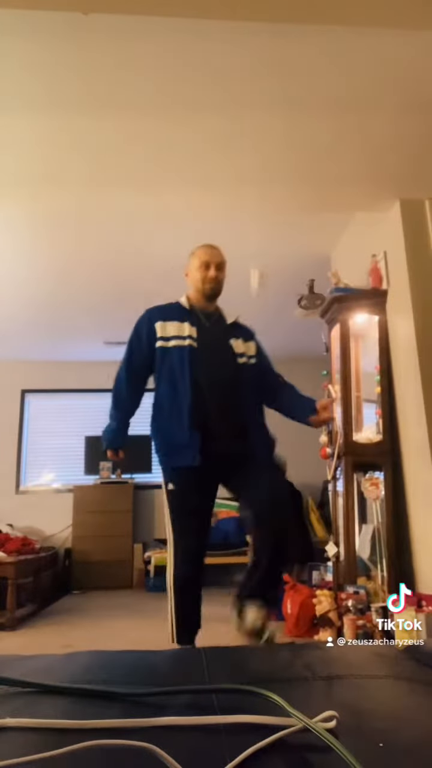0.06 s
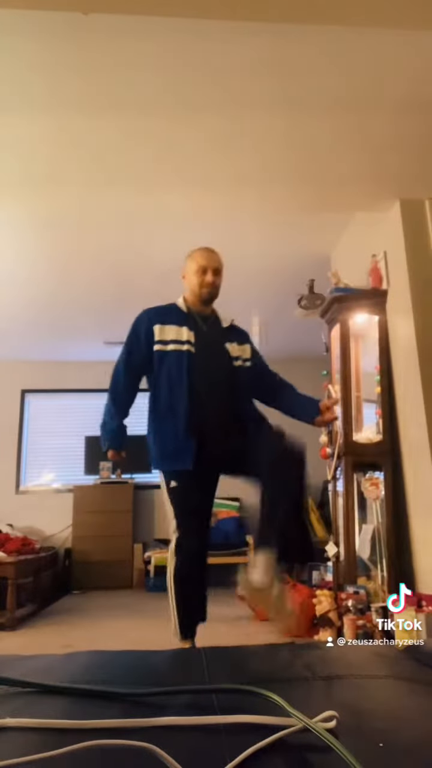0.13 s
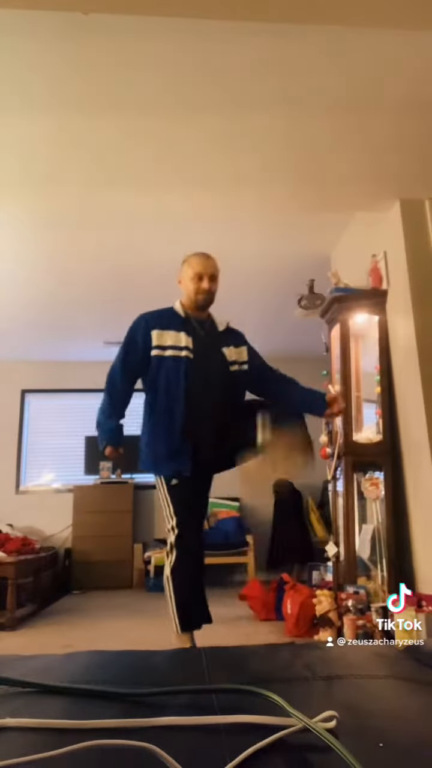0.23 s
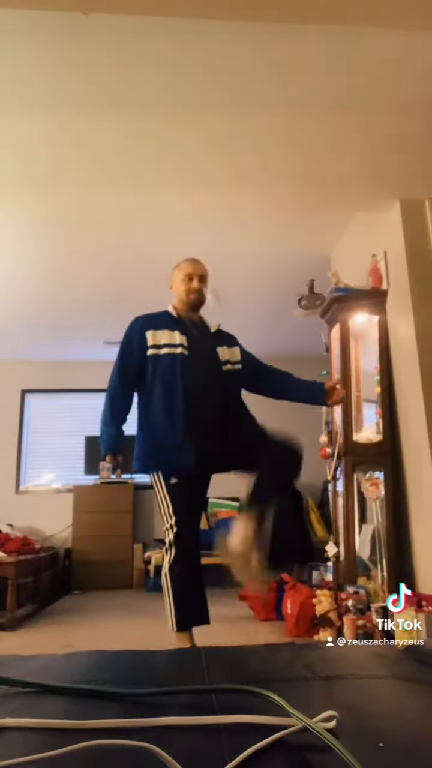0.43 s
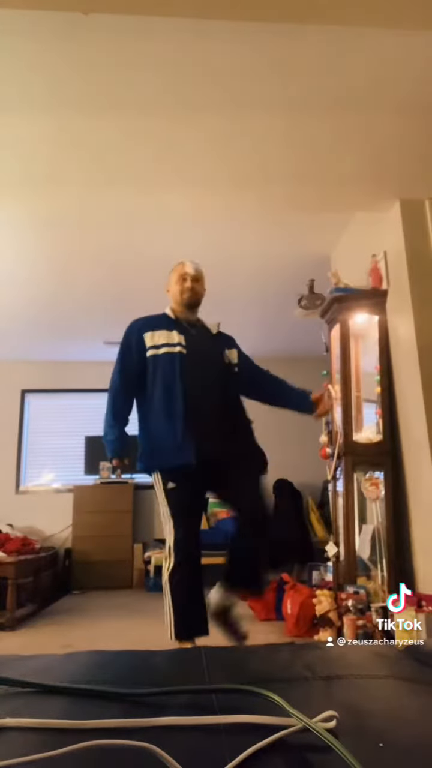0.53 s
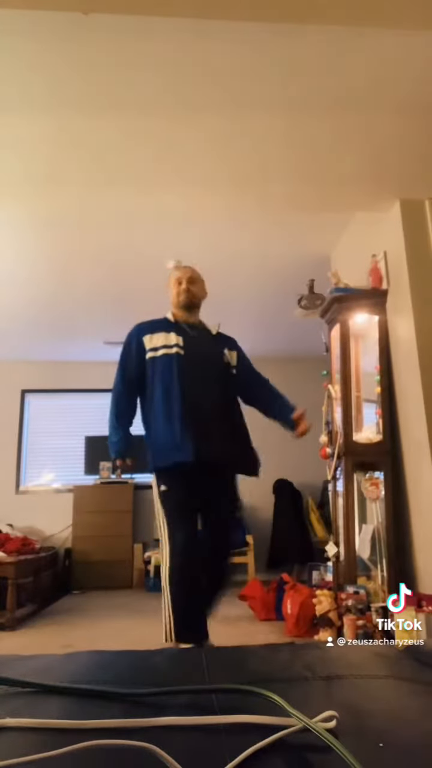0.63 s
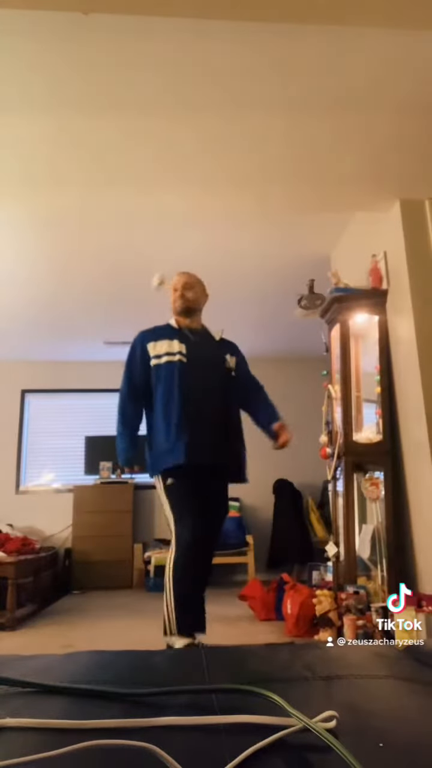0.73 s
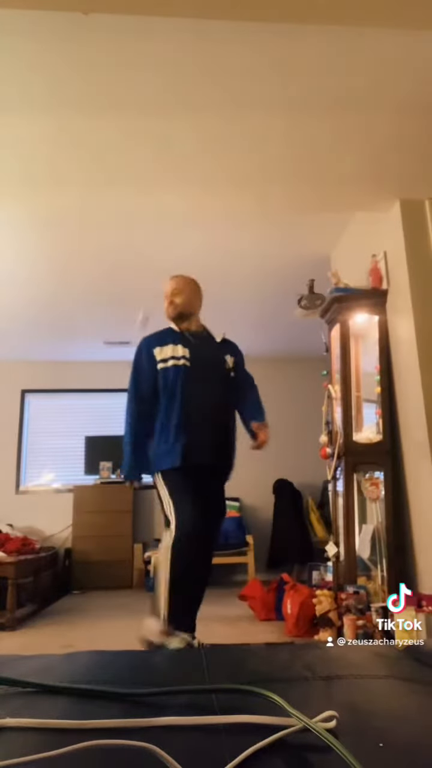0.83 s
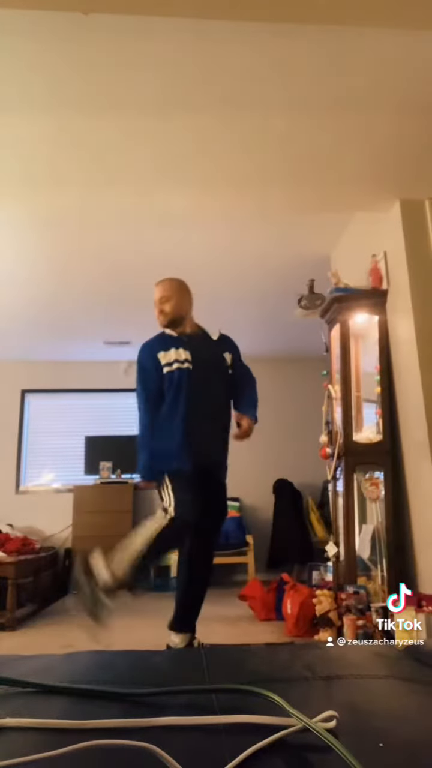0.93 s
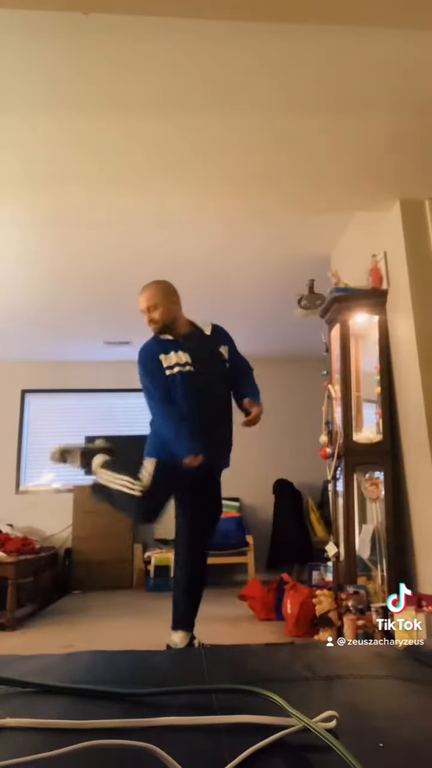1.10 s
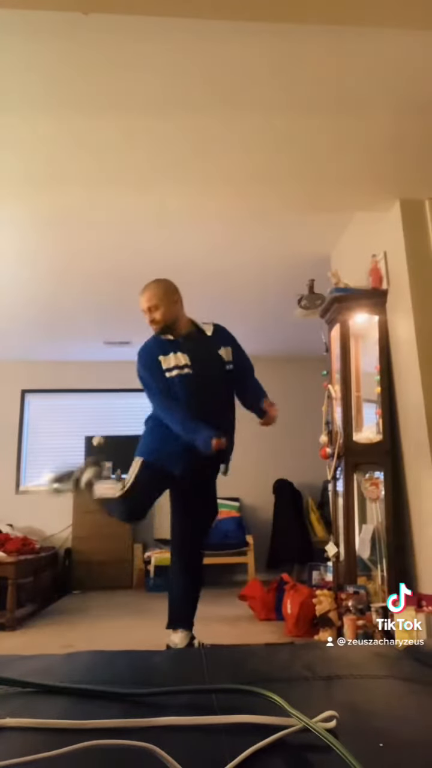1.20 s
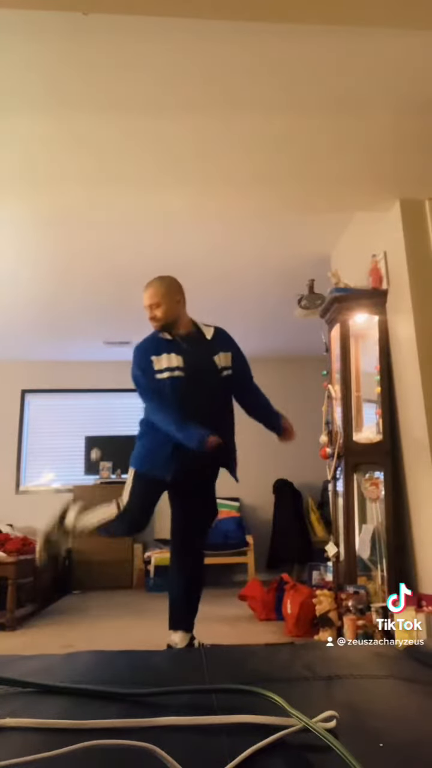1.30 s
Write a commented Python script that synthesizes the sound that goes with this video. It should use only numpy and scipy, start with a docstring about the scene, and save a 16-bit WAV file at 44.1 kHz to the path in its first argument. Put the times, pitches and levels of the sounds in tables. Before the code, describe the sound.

A small footbag is kicked hard at about 0.2 seconds, with a slap, a low thump and a brief bead rattle. A soft, dull bounce follows near 0.6 seconds, and a brighter kick just after 1 second. Track suit cloth swishes and ticks, mostly from 0.8 to 1.2 seconds. Faint footfalls on carpet come in between, over a low hum in a living room with a short echo.

```python
"""Footbag in a living room

A bead-filled bag is kept in the air: a hard kick, a soft bounce off the body, a bright kick.
Each contact slaps and knocks, the filling rattles, and the room returns a low thump. Track suit cloth
swishes, ticks and zips in between, over soft footfalls. Early echoes, a brief room ring, a low hum."""
import sys
import numpy as np
from scipy import signal
from scipy.fft import rfft, irfft
from scipy.io import wavfile
from scipy.ndimage import uniform_filter1d

SR = 44100
rng = np.random.default_rng(int(sys.argv[2]) if len(sys.argv) > 2 else 0)


def generate_wav(sig):
    """Save sig (samples, or channels by samples) to the path in sys.argv[1] as 16-bit PCM at SR."""
    pcm = np.round(np.clip(np.atleast_2d(sig).T, -1, 1) * 32767).astype(np.int16)
    wavfile.write(sys.argv[1], SR, pcm)


N = 59535
TIME = np.arange(N) / SR

# room hiss (frequency [Hz], density [dB])
HISS_SPECTRUM = [(15, -36), (25, 2.5), (129, -1.5), (267, -8), (919, -9), (1340, -14.5), (1660, -16.5),
                 (3260, -16.5), (3530, -18), (3830, -18.5), (5730, -18.5), (9300, -22), (15500, -33)]
# appliance hum (frequency [Hz], rms level [dB])
HUM_TONES = [(60, -61.5), (99, -60.5), (120, -62), (175, -65)]
# cloth on swinging limbs (peak time [s], level [dB], rise [s], t60 [s], low cut [Hz])
CLOTH_SWISHES = [(0.014, -54, 0.038, .35, 500), (0.1, -52.5, 0.013, 0.15, 6000),
                 (0.17, -54.5, 0.072, 1, 2450), (0.435, -49.5, 0.017, 0.26, 5400),
                 (0.754, -51.5, 0.048, 0.2, 676), (0.8, -46, .006, 0.095, 7300),
                 (0.859, -44.5, 0.008, 0.19, 2540), (0.93, -40, 0.018, 0.15, 3060),
                 (0.967, -44.5, .025, 0.19, 1470), (1.001, -44.5, 0.0065, 0.6, 4060),
                 (1.08, -39, 0.035, 0.29, 4000), (1.125, -43.5, 0.06, .3, 2480),
                 (1.203, -58, 0.034, .15, 3500)]
# cloth friction (frequency [Hz], density [dB])
CLOTH_SPECTRUM = [(300, 12), (1000, 1.5), (2200, -0.5), (4000, 0.5), (6500, -0.5), (9000, 2.5),
                  (10800, -0.5), (12000, -4), (13500, -6), (15500, -13.5)]
# steps on carpet (time [s], level [dB], pitch [Hz])
FOOTFALLS = [(0.039, -46, 88), (0.31, -38, 105), (0.609, -44, 121), (0.68, -49, 99), (0.788, -61, 158)]
# shoe and clothing ticks (time [s], level [dB], low edge [Hz], high edge [Hz])
TICK_EVENTS = [(0.097, -29, 7100, 13100), (0.7964, -27, 8000, 13480), (0.8033, -34.5, 8700, 9900),
               (0.994, -20, 6130, 13700), (1.0276, -17, 2060, 5870), (1.1881, -25, 4060, 11370),
               (1.295, -47.5, 1730, 2170)]
# bag contacts (time [s], slap [dB], low cut [Hz], bead spread [s], knock [dB], knock pitch [Hz],
# shoe ring [dB], filling [dB], filling rise [s], thump [dB], thump pitch [Hz])
BAG_CONTACTS = [(0.2204, -15, 118, 0.0016, -17.5, 736, -42, -34.5, 0.0039, -12, 172),
                (0.565, -56, 206, 0.0043, -30.5, 430, -86, -45, 0.018, -24, 138),
                (1.0326, -22, 317, .0024, -33, 370, -44.5, -31.5, 0.018, -52.5, 75)]
# cover slap (frequency [Hz], density [dB])
SLAP_SPECTRUM = [(150, -1), (400, 3.5), (800, 0.5), (1550, 0), (2600, -5.5), (4700, -5.5), (7000, -2),
                 (9500, -4), (11000, -6), (15500, -15.5)]
# knock partials (pitch ratio [1], gain [dB])
KNOCK_MODES = [(.64, -2), (1, 4), (1.6, -6)]
# bead rattle (frequency [Hz], density [dB])
FILLING_SPECTRUM = [(300, 3), (1000, -4), (2000, -7.5), (3600, -6), (6000, -6.5), (8400, -4.5),
                    (11000, -3.5), (15500, -14.5)]
# bag and foot resonances (centre [Hz], width [Hz], boost [dB])
HOLLOW_BANDS = [(800, 180, 0), (1060, 134, 0), (2114, 590, 2), (3700, 900, 5), (5570, 370, 2),
                (6400, 630, 3), (8340, 560, 5.5)]
# shoe modes (frequency [Hz], gain [dB], t60 [s])
SHOE_RESONANCES = [(515.6, -6, 0.195), (944, 6, .2), (1123, -3.5, 0.3), (1930, 8, 0.13), (2085, 6, 0.053),
                   (3320, 1, 0.12), (3732, -1, 0.35), (5470, 2, 0.073), (7820, 8, 0.17), (8370, 7, 0.15)]
# low room modes (frequency [Hz], gain [dB], t60 [s])
ROOM_RESONANCES = [(59.8, -21.5, 0.28), (100, -24, 0.27), (132.2, -22.5, 0.12), (178.8, -25.5, 0.2),
                   (246.1, -20.5, 0.2), (290.6, -20.5, 0.19), (354, -20.5, 0.093), (450.3, -30.5, 0.2),
                   (648, -29, 0.21), (795, -23, 0.12)]
# zipping of clothes on the leg swing (peak time [s], level [dB], rise [s], t60 [s])
ZIP_STROKES = [(0.932, -37.5, 0.014, 0.19), (0.996, -40.5, 0.023, 0.92), (1.08, -33, .015, 0.15),
               (1.135, -48, 0.013, 0.088), (1.194, -41.5, .012, 0.12)]
# zipping bands (centre [Hz], width [Hz], gain [dB])
ZIP_RESONANCES = [(5810, 510, -12.5), (10700, 750, -6)]
# early echoes (delay [s], gain [dB])
REFLECTIONS = [(.0066, -2.5), (0.0184, -11)]
# reverb decay (frequency [Hz], t60 [s])
TAIL_DECAY = [(100, 0.27), (300, 0.14), (800, 0.27), (2000, 0.26), (4500, 0.29), (9000, 0.2), (15000, 0.19)]
# reverb colour (frequency [Hz], gain [dB])
TAIL_SPECTRUM = [(100, -5), (300, -2.5), (800, -3.5), (2000, -2.5), (5000, -2), (9000, -2.5), (15000, -3)]

MODE_RISE_S = 0.0077


def from_db(db):
    """Decibels to gain."""
    return 10 ** (np.asarray(db) / 20)


def rms_one(x):
    """Scale to rms 1."""
    return x / np.sqrt(np.mean(x ** 2) + 1e-20)


def at_hz(points, hz):
    """Read a table on a log-frequency axis."""
    f, value = np.transpose(points)
    return np.interp(np.log(np.maximum(hz, 1)), np.log(f), value)


def coloured(x, spectrum):
    """Apply a spectrum; rms 1."""
    gain = from_db(at_hz(spectrum, np.fft.rfftfreq(N, 1 / SR)))
    return rms_one(irfft(rfft(x) * gain, N))


def filtered(x, hz, kind, order=2):
    """Butterworth filter."""
    return signal.sosfilt(signal.butter(order, hz, kind, fs=SR, output="sos"), x + 1e-18)


def delayed(x, delay_s):
    """Shift later in time."""
    return np.concatenate([np.zeros(int(delay_s * SR)), x])[:N]


def envelope(start_s, rise_s, t60_s):
    """Rounded attack, exponential release."""
    t = TIME - start_s
    attack = np.sin(np.pi / 2 * np.clip(t / rise_s, 0, 1)) ** 2
    return attack * from_db(-60 * np.maximum(t - rise_s, 0) / t60_s)


def ring(start_s, hz, rise_s, t60_s):
    """Decaying sine."""
    return envelope(start_s, rise_s, t60_s) * np.sin(2 * np.pi * hz * (TIME - start_s))


def grains(clicks_per_s=2500, click_share=0.62):
    """Dense tiny clicks on smooth friction noise."""
    clicks = rng.standard_normal(N) * (rng.random(N) < clicks_per_s / SR)
    return np.sqrt(click_share) * rms_one(clicks) + np.sqrt(1 - click_share) * rng.standard_normal(N)


def scattered_click(spread_s, coherence_hz=198.5):
    """Flat unit-energy click, smeared in time; nearby frequencies arrive together."""
    hz = np.fft.rfftfreq(N, 1 / SR)
    lags_s = spread_s * np.minimum(rng.exponential(1, 2000), 4)
    group_delay_s = np.interp(hz / coherence_hz, np.arange(len(lags_s)), lags_s)
    return irfft(np.exp(-2j * np.pi * np.cumsum(group_delay_s) * SR / N), N)


def room_tone(hiss_db=-55.5):
    """Household appliances hum under a faint hiss."""
    hum = sum(from_db(db) * np.sqrt(2) * np.sin(2 * np.pi * (hz * TIME + rng.random()))
              for hz, db in HUM_TONES)
    return hum + from_db(hiss_db) * coloured(rng.standard_normal(N), HISS_SPECTRUM)


def cloth():
    """Fabric rubs on fabric in short grainy swishes."""
    out = np.zeros(N)
    for peak_s, db, rise_s, t60_s, cut_hz in CLOTH_SWISHES:
        rub = rms_one(filtered(coloured(grains(), CLOTH_SPECTRUM), cut_hz, "high", order=1))
        out += from_db(db) * rub * envelope(peak_s - rise_s, rise_s, t60_s)
    return out


def steps():
    """The floor booms faintly as the weight shifts."""
    return sum(from_db(db) * ring(time_s, hz, rise_s=0.0043, t60_s=0.092) for time_s, db, hz in FOOTFALLS)


def ticks():
    """Shoe and clothing give small snaps, each in its own band."""
    out = np.zeros(N)
    for time_s, db, low_hz, high_hz in TICK_EVENTS:
        click = delayed(scattered_click(spread_s=0.000395), time_s)
        band_share = 2 * (high_hz - low_hz) / SR
        out += from_db(db) * filtered(click, [low_hz, high_hz], "band") / band_share
    return out


def slap(start_s, spread_s):
    """Beads hit the cover within milliseconds of each other."""
    burst = coloured(scattered_click(spread_s), SLAP_SPECTRUM)
    return delayed(burst, start_s) * np.sqrt(spread_s * SR / N)


def knock(start_s, hz):
    """The struck spot gives a dull, damped note."""
    partials = sum(from_db(db) * ring(start_s, ratio * hz, rise_s=0.0016, t60_s=0.015)
                   for ratio, db in KNOCK_MODES)
    return filtered(partials, 1120, "low", order=4)


def filling(start_s, rise_s):
    """Beads rattle as they settle."""
    return coloured(grains(), FILLING_SPECTRUM) * envelope(start_s, rise_s, t60_s=0.12)


def bag():
    """The bag lands on foot or body: rattle, slap and knock."""
    out = np.zeros(N)
    for time_s, slap_db, cut_hz, spread_s, knock_db, knock_hz, _, fill_db, rise_s, _, _ in BAG_CONTACTS:
        hit = from_db(fill_db) * filling(time_s, rise_s)
        hit += from_db(slap_db) * slap(time_s, spread_s)
        hit += from_db(knock_db) * knock(time_s, knock_hz)
        out += filtered(hit, cut_hz, "high", order=3)
    return out


def hollow(x):
    """Broad resonances of bag and foot colour the contacts."""
    for hz, width_hz, db in HOLLOW_BANDS:
        band = filtered(x, [hz - width_hz / 2, hz + width_hz / 2], "band", order=1)
        x = x + (from_db(db) - 1) * band
    return x


def shoe():
    """The struck shoe rings faintly."""
    return sum(from_db(shoe_db + db) * ring(time_s, hz, MODE_RISE_S, t60_s)
               for time_s, _, _, _, _, _, shoe_db, *_ in BAG_CONTACTS
               for hz, db, t60_s in SHOE_RESONANCES)


def thumps(lag_s=0.0122):
    """A low thump comes back from the room just after each contact, and the room modes boom."""
    out = np.zeros(N)
    for time_s, *_, thump_db, thump_hz in BAG_CONTACTS:
        start_s = time_s + lag_s
        thump = filtered(ring(start_s, thump_hz, rise_s=0.0015, t60_s=0.027), 69, "high")
        boom = sum(from_db(db) * ring(start_s, hz, MODE_RISE_S, t60_s)
                   for hz, db, t60_s in ROOM_RESONANCES)
        out += from_db(thump_db) * (thump + boom)
    return out


def zips():
    """Ribbed fabric and zip fittings sing in narrow bands."""
    song = sum(from_db(db) * rms_one(filtered(grains(), [hz - width_hz / 2, hz + width_hz / 2], "band"))
               for hz, width_hz, db in ZIP_RESONANCES)
    strokes = sum(from_db(db) * envelope(peak_s - rise_s, rise_s, t60_s)
                  for peak_s, db, rise_s, t60_s in ZIP_STROKES)
    return song * strokes


def early_echoes(x, low_cut_hz=1430):
    """Ceiling and walls return the treble, slightly scattered."""
    response = sum(from_db(db) * delayed(scattered_click(spread_s=0.0013), delay_s)
                   for delay_s, db in REFLECTIONS)
    return signal.fftconvolve(filtered(x, low_cut_hz, "high", order=1), response[:SR // 20])[:N]


def evened(response, evenness=0.74):
    """Smooth the reverb's spectrum so the tail sounds even, without ringing tones."""
    spectrum = rfft(response)
    narrow, broad = (uniform_filter1d(np.abs(spectrum) ** 2, size=bins) + 1e-9 for bins in (12, 300))
    return irfft(spectrum * (broad / narrow) ** (evenness / 2), N)[:SR // 2]


def room_tail(x, gain_db=0.5):
    """Diffuse reverberation dies band by band."""
    edges_hz = np.geomspace(50, 17000, 15)
    response = np.zeros(N)
    for low_hz, high_hz in zip(edges_hz, edges_hz[1:]):
        hz = np.sqrt(low_hz * high_hz)
        decay = envelope(start_s=0.0042, rise_s=0.011, t60_s=at_hz(TAIL_DECAY, hz))
        band = rms_one(filtered(rng.standard_normal(N), [low_hz, high_hz], "band") * decay)
        band_share = 2 * (high_hz - low_hz) / SR
        response += from_db(at_hz(TAIL_SPECTRUM, hz)) * band * np.sqrt(band_share / N)
    return from_db(gain_db) * signal.fftconvolve(x, evened(response))[:N]


def scene():
    """Player and bag in the room; mono."""
    sharp = hollow(bag()) + ticks()
    thump, swish = thumps(), cloth()
    tail = room_tail(sharp + from_db(-6.5) * thump + from_db(-8.5) * swish)
    direct = sharp + thump + swish + shoe() + zips() + steps()
    return (direct + early_echoes(sharp) + tail + room_tone())[None]


def record(dry, low_cut_hz=52.7, high_cut_hz=15700):
    """The microphone loses the deepest bass; the top is cut steeply."""
    top_cut = signal.ellip(10, .1, 80, high_cut_hz, fs=SR, output="sos")
    return signal.sosfilt(top_cut, filtered(dry, low_cut_hz, "high", order=3))


dry = scene()
out = record(dry)
generate_wav(out)
```